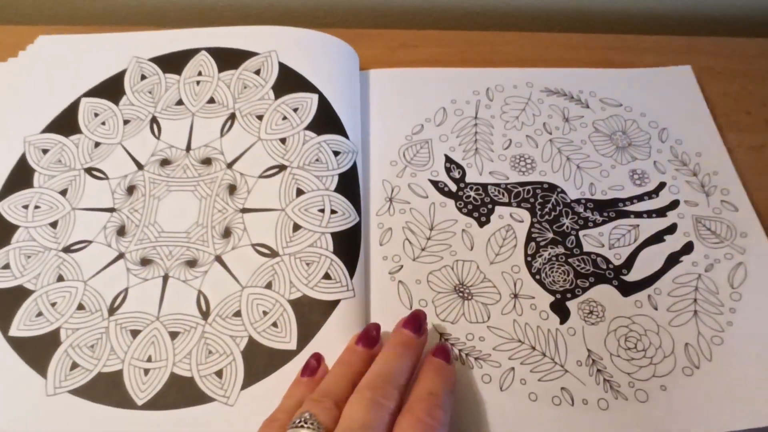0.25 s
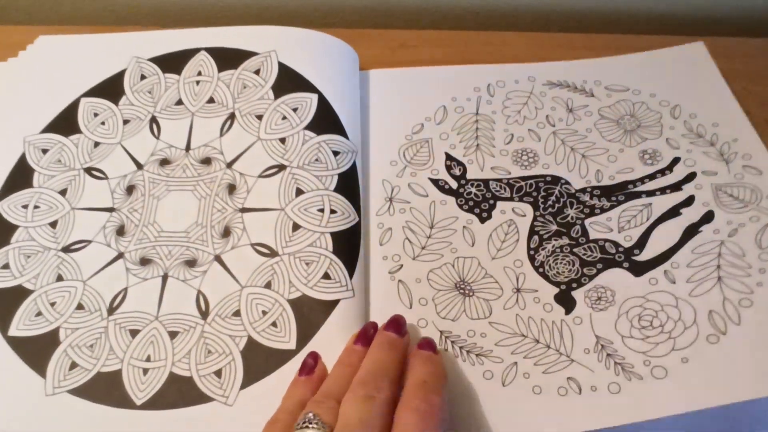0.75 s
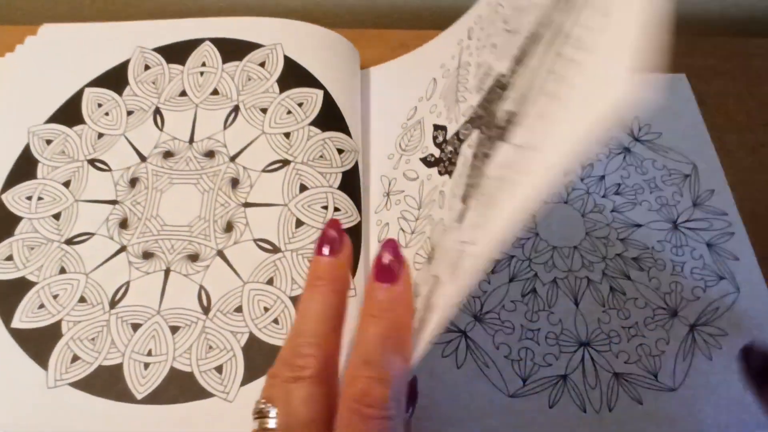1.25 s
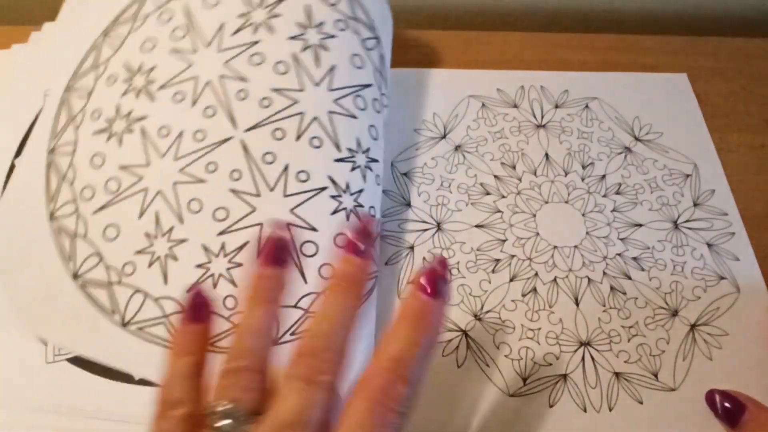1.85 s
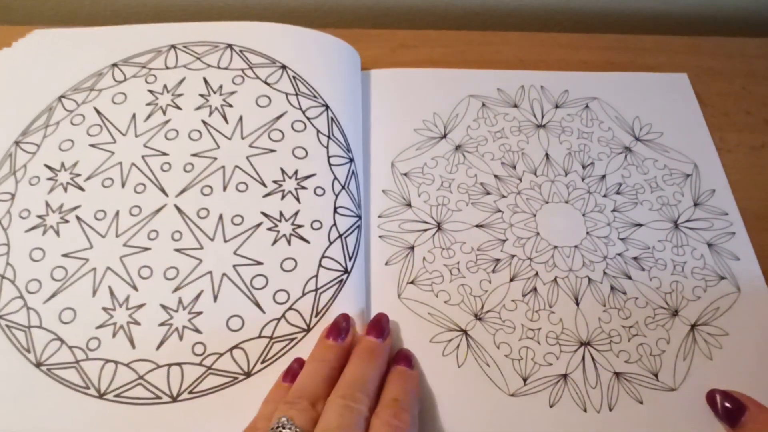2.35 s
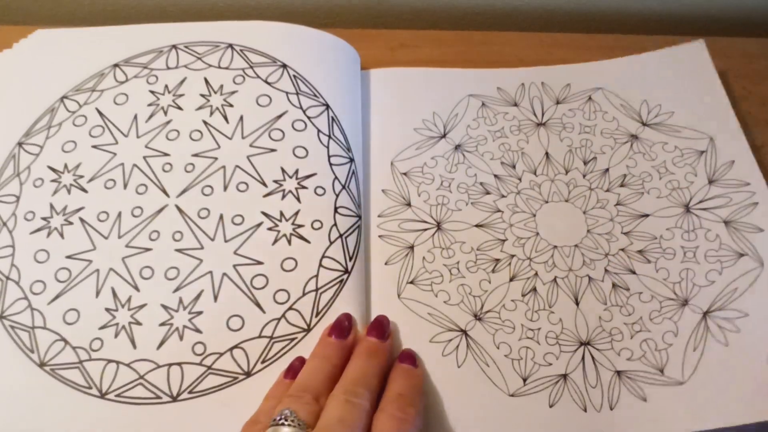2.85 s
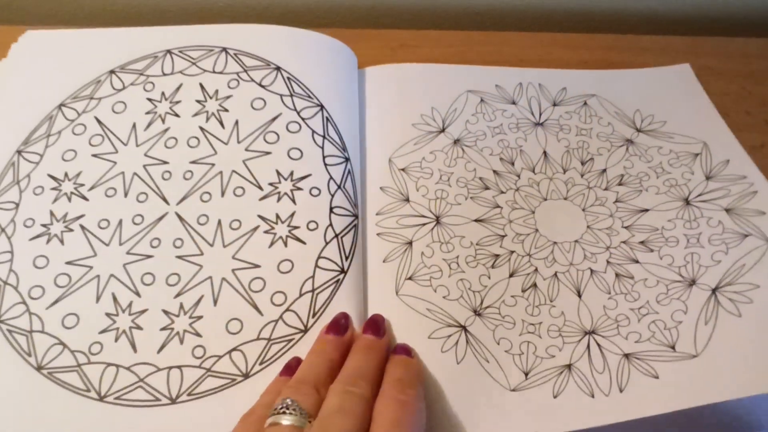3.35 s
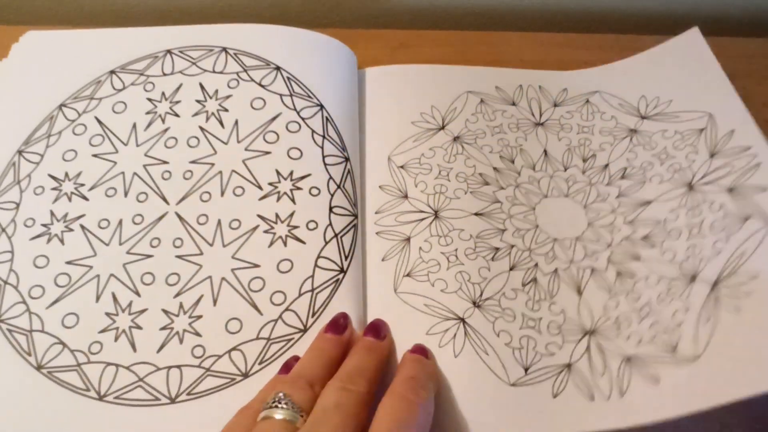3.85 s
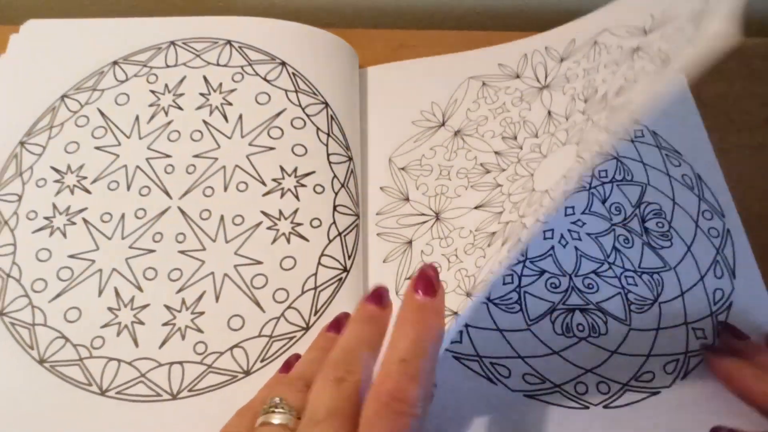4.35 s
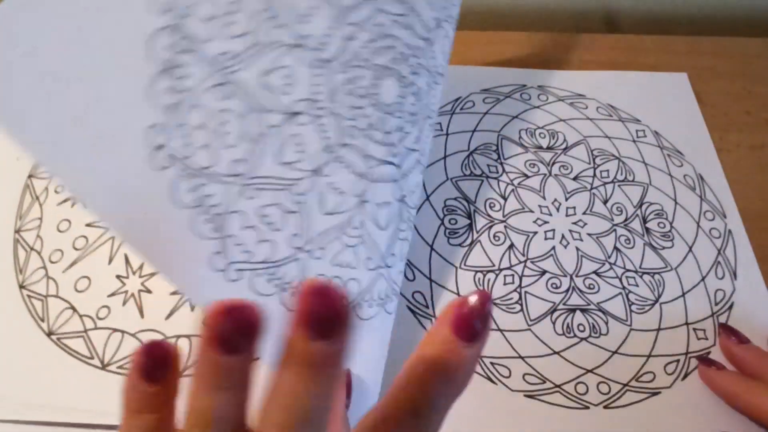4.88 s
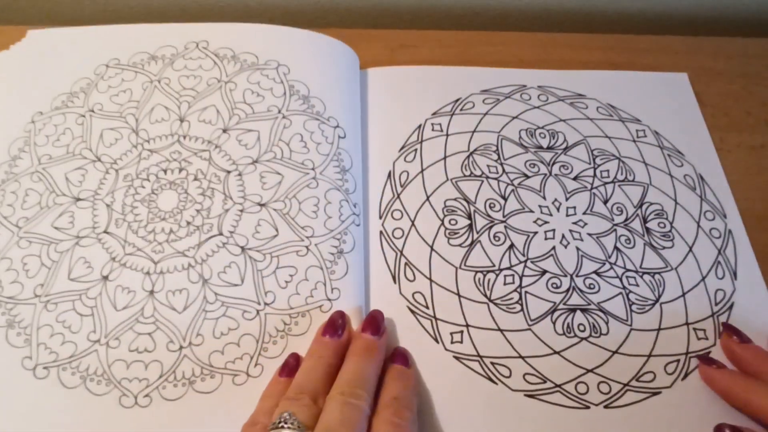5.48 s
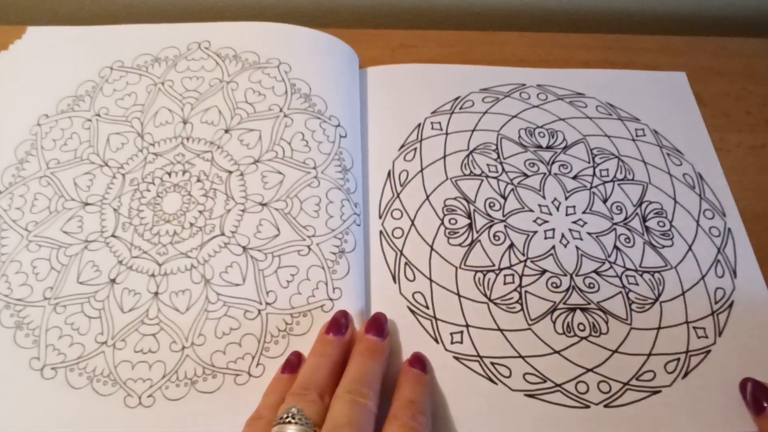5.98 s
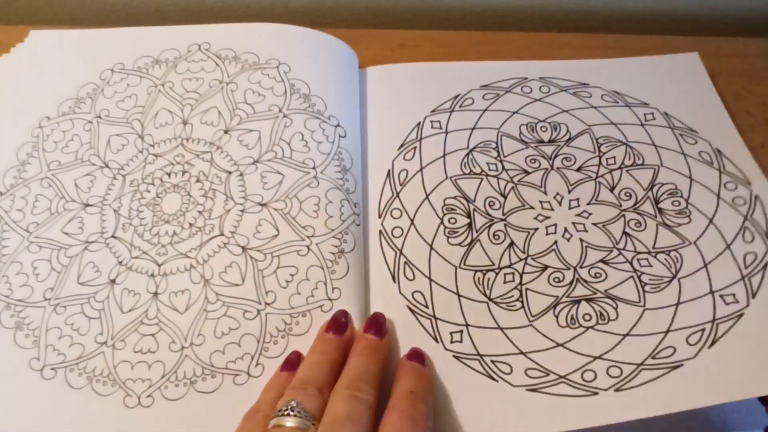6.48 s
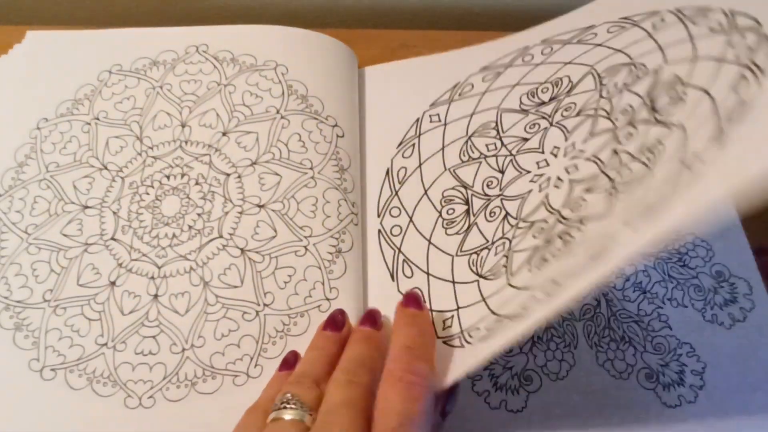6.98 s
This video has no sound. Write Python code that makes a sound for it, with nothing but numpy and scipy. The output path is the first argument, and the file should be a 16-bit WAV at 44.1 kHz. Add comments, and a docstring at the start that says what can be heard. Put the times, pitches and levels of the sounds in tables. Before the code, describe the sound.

Close above a desk in a small, quiet room, stiff paper pages are turned by hand. Soft thumps and small snaps come first, then a sliding swish and a hollow pop as the first page lies flat. After a faint lull, corner flicks and a sharp crackle start the second turn, which rustles over and pops flat. Light rubbing follows, then a crisp snap as a third page lifts.

```python
"""A faint brush of paper and a cluster of soft snaps and thumps open the turning of three stiff pages.
They belong to a colouring book, turned by hand on a desk in a small room, heard from close above.
Each page snaps at its picked corner (sharp steps), bends and flutters (bunched clicks), and slides
over its neighbour (grainy filtered noise); the first two pop flat after being laid down (damped modes).
Pitched scrapes, thumps of the book, echoes and a quiet background noise complete the scene."""
import sys
import numpy as np
from scipy import signal
from scipy.io import wavfile
from scipy.ndimage import uniform_filter1d

SR = 44100
rng = np.random.default_rng(int(sys.argv[2]) if len(sys.argv) > 2 else 0)


def transcribe(u):
    """Save the signal u as a 16-bit wav file named by the first command-line argument.

    u: samples, shape (n,) or (channels, n), limited to [-1, 1]; the rate is SR.
    q: integer samples, one column per channel.
    """
    v = np.clip(np.atleast_2d(u).T, -1, 1)
    q = np.round(v * 32767).astype(np.int16)
    wavfile.write(sys.argv[1], SR, q)


N = 318402  # length [samples]


def amp(db):
    """Decibels to gain."""
    return 10 ** (np.asarray(db) / 20)


def unit(x):
    """Scales to rms 1."""
    return x / np.sqrt(np.mean(x ** 2) + 1e-20)


def read(points, hz):
    """Reads a table on a log-frequency axis."""
    table_hz, value = np.transpose(points)
    return np.interp(np.log(hz + 1), np.log(table_hz + 1), value)


def add(mix, s, sound):
    """Mixes a sound in at time s [s]."""
    part = mix[max(round(s * SR), 0):][:len(sound)]
    part += sound[:len(part)]


def response(points, size=4096):
    """Causal minimum-phase impulse response with the given spectrum."""
    hz = abs(np.fft.fftfreq(size, 1 / SR))
    log_gain = np.log(amp(read(points, hz)))
    # the Hilbert transform of the log gain supplies the phase
    spectrum = np.exp(np.conj(signal.hilbert(log_gain)))
    return np.fft.ifft(spectrum).real[:size // 2]


def colour(x, points):
    """Filters by a spectrum, keeping the power of white noise."""
    taps = response(points)
    return signal.oaconvolve(x, taps / np.linalg.norm(taps))[:len(x)]


def lowpass(x, order, hz):
    """Butterworth low-pass along the last axis."""
    return signal.sosfilt(signal.butter(order, hz, fs=SR, output="sos"), x)


def highpass(x, order, hz):
    """Butterworth high-pass along the last axis."""
    return signal.sosfilt(signal.butter(order, hz, "highpass", fs=SR, output="sos"), x)


def grains(length, per_s, spread_db):
    """Random clicks of uneven size and either sign, rms 1."""
    size = amp(spread_db * np.minimum(rng.exponential(1, length), 4))
    sign = rng.choice([-1, 1], length)
    present = rng.random(length) < per_s / SR
    return unit(size * sign * present)


def patchy(x, depth_db=1.1, size=512):
    """The colour wanders a little as the contact patch moves over the sheet."""
    z = signal.stft(x, nperseg=size)[2]
    field = uniform_filter1d(rng.standard_normal(z.shape), size=4, axis=0)  # smooth over frequency
    field = unit(uniform_filter1d(field, size=5, axis=1))  # smooth over time
    return unit(signal.istft(z * amp(depth_db * field), nperseg=size)[1][:len(x)])


# spectrum of the background noise: (frequency [Hz], relative level [dB])
AMBIENCE = [(30, 2.5), (110, 4), (300, -1), (600, -8.5), (1200, -12), (2500, -20.5), (5000, -20),
            (7500, -19.5), (16000, -12)]


def background(level_db=-65):
    """Steady noise, strongest in the lows, under the paper."""
    return amp(level_db) * colour(rng.standard_normal(N), AMBIENCE)


# echoes from desk and walls: (delay [s], gain before dulling)
ECHOES = [(.0029, 0.1), (.0062, 0.071), (.0091, 0.49), (0.0113, .2), (0.0142, 0.39), (0.021, 0.25)]
# time for the room's tail to fall by 60 dB: (frequency [Hz], time [s])
ROOM_T60 = [(150, 0.28), (400, 0.58), (800, 0.3871), (1500, 0.3), (3500, 0.43), (7300, 0.45)]
# colour of the room's tail: (frequency [Hz], relative level [dB])
ROOM_COLOUR = [(150, -3), (800, -5.5), (2500, -4.5), (7000, -12.5), (14000, -13)]


def room(x, tail_db=-1, build_s=0.018, echo_edge_hz=4500, size=256):
    """A few dull early echoes, and a tail that builds up, then dies band by band."""
    hz, t, z = signal.stft(rng.choice([-1., 1.], SR // 2), SR, nperseg=size)
    z = z * amp(-60 * t / read(ROOM_T60, hz)[:, None])
    tail = signal.istft(z * amp(read(ROOM_COLOUR, hz))[:, None], SR, nperseg=size)[1]
    plain = signal.istft(z, SR, nperseg=size)[1]
    onset = 1 - np.exp(-(np.arange(len(tail)) / SR / build_s) ** 2)
    # scaled by the uncoloured tail, so the room's colour also sets its level
    tail *= amp(tail_db) * onset / np.linalg.norm(plain * onset)
    early = np.zeros(len(tail))
    for delay, gain in ECHOES:
        early[round(delay * SR)] += gain
    return signal.fftconvolve(x, tail + lowpass(early, 1, echo_edge_hz))[:N]


# fingers and pages bumping the block of the book: (time [s], level [dB], pitch [Hz])
THUMPS = [(0.1266, -36, 406), (.148, -33, 390), (0.1817, -30.5, 390), (0.2645, -29.5, 308),
          (0.3099, -37.5, 282), (1.758, -39, 109.5), (2.396, -45, 120), (2.715, -53, 218),
          (3.82, -36.5, 88.6), (4.552, -42.5, 170), (4.619, -36, 147.5), (4.655, -40.5, 200),
          (4.917, -41, 200), (5.506, -42.5, 144.7), (5.711, -44.5, 280)]


def thumps(cycles=0.46, size=4096):
    """A soft push on the stack of pages: a low sine gone within a cycle or two."""
    out, t = np.zeros(N), np.arange(size) / SR
    for s, db, hz in THUMPS:
        add(out, s, amp(db) * np.exp(-t * hz / cycles) * np.sin(2 * np.pi * hz * t))
    return out


# fingertip or paper dragging with a hoarse, pitched scrape:
# (time [s], length [s], level before the swell [dB], centre [Hz], width [Hz])
SCRAPES = [(0.379, .12, -64, 4450, 1530), (.49, .13, -61, 4730, 1930), (0.783, 0.084, -66, 3050, 600),
           (0.938, 0.061, -61, 3246, 1500), (2.171, .1, -55.5, 715.5, 214), (2.807, 0.24, -64, 5450, 443),
           (3.017, 0.14, -70, 2970, 390), (4.599, 0.06, -55, 5920, 900), (5.205, 0.13, -56.5, 4980, 1025),
           (6.474, 0.08, -52.5, 2358, 597), (6.921, 0.054, -53.5, 3180, 300)]


def scrapes(size=2048):
    """The contact sticks and slips at a loose rate: a fuzzy band of noise that swells and fades."""
    out = np.zeros(N)
    for s, length, db, hz, width in SCRAPES:
        t = np.arange(round(length * SR)) / SR
        # two slow noises on a carrier; the filter's start-up is cut off
        slip = lowpass(rng.standard_normal((2, len(t) + size)), 2, width / 2)[:, size:]
        phase = 2 * np.pi * hz * t
        band = unit(slip[0] * np.cos(phase) + slip[1] * np.sin(phase))
        add(out, s, amp(db) * band * np.sin(np.pi * t / length))
    return out


# strokes of paper or fingers over paper, page after page:
# (start [s], speeding up [s], slowing down [s], friction level before the slide's mix gains [dB],
#  sheet body re friction [dB], edge hiss re friction [dB])
STROKES = [(0, 0.0067, 0.066, -59.5, 1.5, -2), (.3, 0.14, .2, -66, -7.5, -3.5),
           (.705, 0.014, 0.058, -65.5, -3, 7), (0.794, 0.017, 0.089, -65, 0.5, 8),
           (.93, 0.023, 0.1, -63.5, 3.5, 0.5), (1.085, 0.028, 0.17, -55.5, -1.5, 0),
           (1.356, .02, 0.27, -63, 1, 2), (1.52, .12, 0.08, -56.5, -1, 3),
           (1.648, 0.06, 0.042, -50, -2.5, 2), (1.72, 0.1, 0.21, -58, 3, 2), (1.89, 0.043, .11, -56, -2, 6),
           (2.099, 0.08, 0.12, -55, -4.5, 3.5), (2.24, 0.087, 0.13, -69, 1.5, 4.5),
           (2.73, 0.038, .04, -77, 4, 7), (2.825, 0.017, 0.079, -66, 1, -0.5),
           (2.89, 0.069, 0.051, -61, -2, 4), (3.04, 0.059, 0.095, -68, -3, 4.5),
           (3.15, 0.11, .07, -58, -7.5, 3.5), (3.369, 0.048, .09, -66, 12, 3),
           (3.53, 0.04, 0.24, -56.5, -8, 3.5), (3.84, 0.11, 0.052, -61.5, 6.5, 8.5),
           (4.02, .04, 0.13, -71, 17, 8), (4.119, 0.084, 0.06, -54.5, 12, 7),
           (4.27, 0.15, 0.28, -59.5, 2, -1), (4.39, 0.12, 0.03, -52.5, -1.5, 6.5),
           (4.569, 0.13, 0.2, -56, -1.5, 2), (4.82, 0.13, 0.095, -57.5, 1, 3.5),
           (5, 0.032, 0.16, -54.5, -0.5, -1), (5.215, 0.04, 0.093, -55, -4, 2.5),
           (5.25, 0.037, 0.14, -62, -2, 7), (5.38, 0.18, 0.12, -69, -0.5, 2),
           (5.649, .03, 0.12, -72.5, -4.5, 2.5), (6.39, 0.01, 0.046, -70.5, 5, 0.5),
           (6.463, 0.012, 0.14, -59.5, 2.5, 3), (6.63, 0.12, 0.064, -55.5, -7, 1),
           (6.905, 0.033, 0.062, -53.5, 1.5, 3.5), (7.07, 0.11, .1, -56.5, -2, 2.5)]
STROKE_CURVE = 1.095  # friction grows as this power of the speed
RESTING_DB = -90  # the hand never lies quite still on the page


def stroke_levels(uneven_db=1.5, uneven_s=.018):
    """Strokes speed up, slow to rest and add in power: dB of friction, and of body and hiss against it."""
    power = np.full((3, N), amp(RESTING_DB) ** 2)
    for s, rise, fall, db, body_db, hiss_db in STROKES:
        t = np.arange(0, rise + fall, 1 / SR)
        progress = np.interp(t, [0, rise, rise + fall], [0, .5, 1])
        speed = abs(np.sin(np.pi * progress))
        for layer, colour_db in zip(power, (0, body_db, hiss_db)):
            add(layer, s, (amp(db + colour_db) * speed ** STROKE_CURVE) ** 2)
    level, body, hiss = 10 * np.log10(power)
    # the hand's pressure is never quite even
    pressure = unit(uniform_filter1d(rng.standard_normal(N), size=max(round(uneven_s * SR), 1)))
    return level + uneven_db * pressure, body - level, hiss - level


# spectra of rubbing fibres, sheet body and sheet edge: (frequency [Hz], relative level [dB])
FRICTION = [(100, -42), (900, -13.5), (2000, -2), (3000, 1.5), (4400, 3), (5600, 5.5), (7000, -18.5),
            (16000, -25)]
BODY = [(60, -4.5), (150, -3), (350, -5), (530, -3.5), (780, 2), (1200, 0), (1900, -3.5), (2800, -18),
        (6000, -53.5)]
HISS = [(100, -61), (3500, -28), (5300, -7.5), (6400, 1), (7500, 6), (8500, -1), (12000, -3.5),
        (16000, -4.5)]


def slide(friction_db=0, body_db=0, hiss_db=2, catch=.75,
          fizz_db=-8, fizz_growth=0.41, usual_db=-58, fizz_hz=11000):
    """Fibres slip and catch: a smooth hiss with fine grains, radiated by the sheet and its edge."""
    level, body, hiss = stroke_levels()
    catches = catch * grains(N, per_s=700, spread_db=3.5)
    out = np.zeros(N)
    for spectrum, db in (FRICTION, friction_db), (BODY, body + body_db), (HISS, hiss + hiss_db):
        rubbing = patchy(rng.standard_normal(N) + catches)
        out += amp(level + db) * colour(rubbing, spectrum)
    # a fast edge fizzes in the top octave, more than in proportion
    fizz = highpass(rng.standard_normal(N), 4, fizz_hz)
    edge_db = level + hiss
    return out + amp(edge_db + fizz_growth * (edge_db - usual_db) + fizz_db) * fizz


# runs of tiny buckles as the sheet bends:
# (time [s], rise [s], fall time constant [s], level [dB], upper edge [Hz])
FLUTTERS = [(1.155, 0.018, 0.034, -55, 1800), (1.199, 0.021, 0.021, -50, 740),
            (1.752, 0.0058, 0.017, -38.5, 890), (2.179, 0.011, 0.05, -71, 780),
            (3.633, 0.0076, 0.018, -51, 1470), (3.76, 0.0046, 0.072, -50.5, 1160),
            (3.809, 0.0058, 0.004, -28.5, 1800), (3.817, 0.0009, 0.014, -20.5, 2400),
            (3.82, 0.0023, 0.0094, -17.5, 5900), (4.081, 0.015, 0.031, -33.5, 2100),
            (4.14, 0.0039, 0.014, -27, 2200), (4.261, 0.0041, 0.014, -36.5, 1320),
            (4.617, 0.0038, 0.011, -47, 700), (4.886, 0.01, 0.058, -39.5, 787),
            (4.91, .012, 0.024, -38, 1880), (4.943, 0.0025, .012, -42.5, 1290),
            (5.462, 0.045, 0.022, -50.5, 648), (6.988, 0.011, 0.012, -37.5, 1258),
            (7.062, 0.011, 0.019, -43, 1370)]
# spectrum of the bending sheet: (frequency [Hz], relative level [dB])
BENDING = [(60, 0.5), (130, -7), (300, -8.5), (520, -4.5), (750, 0.5), (1200, 0.5), (2050, -0.5),
           (2400, -4), (3300, -8), (4200, -2), (5000, -9), (7500, -9), (16000, -14)]


def flutters(rush=0.54, flaps_per_s=110, throb_db=3, settle_s=0.018, low_share=0.21, size=16384):
    """Many small buckles in quick succession; the sharper the bend, the higher they sound."""
    out, t = np.zeros(N), np.arange(size) / SR
    for s, rise, fall, db, edge_hz in FLUTTERS:
        buckles = grains(size, per_s=2300, spread_db=2.5) + rush * rng.standard_normal(size)
        # after the first rush the sheet starts to flap, and the buckles come in uneven bunches
        wander = unit(uniform_filter1d(rng.standard_normal(size), size=300))
        turns = np.cumsum(flaps_per_s * (1 + .5 * wander)) / SR
        buckles *= amp(throb_db * np.minimum(t / settle_s, 1) * np.cos(2 * np.pi * turns))
        softened = lowpass(colour(buckles, BENDING), 3, edge_hz)
        softened = highpass(softened, 1, low_share * edge_hz)
        swell = np.minimum(t / rise, 1) * np.exp(-np.maximum(t - rise, 0) / fall)
        # the level holds at the height of the swell
        add(out, s, amp(db) * unit(softened * swell) * np.sqrt(np.mean(swell ** 2)))
    return out


# page edges snapping off a fingertip:
# (time [s], level before snap_db [dB], sheet body re friction [dB], edge hiss before hiss_db [dB])
SNAPS = [(.022, -53, -10, 0), (0.1269, -46.5, 4, -2.5), (0.149, -44, 4, 1), (0.1817, -41.5, 3, 1),
         (0.266, -38, -2, -2.5), (0.3102, -39.5, 0.5, -2), (1.366, -51, -12, 0.5), (1.918, -46.5, 5.5, 7),
         (1.949, -42, 1.5, 6), (2.095, -53, 1, 2), (3.3097, -41, 2.5, 2.5), (3.3652, -33.5, 4.5, 0.5),
         (3.4011, -32.5, 6.5, 0), (3.424, -35, 7, 1.5), (3.806, -27, -4, -4.5), (4.137, -42, 9, 9),
         (4.1437, -25, 4.5, 3), (4.181, -29.5, -9, -10), (4.207, -31, -22, -1.5), (4.227, -42, 5.5, 0),
         (4.2668, -43, 2, -22), (4.851, -43.5, -9, -0.5), (5.1645, -55, 5, 9.5), (5.2211, -54.5, 10.5, -3),
         (6.135, -67, -4, 6), (6.3945, -60, 0, 1), (6.467, -52, 3, 5), (6.473, -47.5, 6, 2),
         (6.487, -31, .5, -6), (6.6359, -52.5, 4, 7.5), (6.8084, -40, 6.5, 3.5), (7.0953, -48, 0, 0.5),
         (7.21, -44.5, -1, 6)]


def snaps(snap_db=17, scuff=0.11, scuff_s=0.0058, body_db=0, hiss_db=1, size=2048):
    """An edge lets go: one sharp step and a brief scuff, coloured by fibres, sheet and edge."""
    out, t = np.zeros(N), np.arange(size) / SR
    for s, db, body, hiss in SNAPS:
        kick = scuff * rng.standard_normal(size) * np.exp(-t / scuff_s) - (t == 0)
        kick /= np.linalg.norm(kick)
        sound = colour(kick, FRICTION)
        sound += amp(body + body_db) * colour(kick, BODY)
        sound += amp(hiss + hiss_db) * colour(kick, HISS)
        add(out, s, amp(db + snap_db) * sound)
    return out


# the bowed sheet popping through: (time [s], level [dB], pitch [Hz], gain of the upper modes [dB])
POPS = [(.2835, -36, 900, -5), (1.209, -43, 575, -15), (1.232, -39.5, 583, -14), (1.729, -37, 760, -20),
        (1.7585, -35, 790, -10), (1.768, -37, 666, -5), (1.9498, -37, 1197, -2.5), (2.229, -39, 677, -10),
        (2.3958, -14, 822, -2), (4.1068, -24, 851, -8), (4.197, -30, 920, 4), (4.2642, -28, 896, 0),
        (4.8895, -43, 920, -1), (4.9235, -25, 850, -6), (5.4585, -43.5, 712.7, -18),
        (5.506, -16.5, 802, -6.5), (5.672, -47.5, 670, -12), (5.708, -47.5, 650, -13.5),
        (7.0042, -25.5, 853, -23.5), (7.0635, -34.5, 760, -18), (7.0808, -30, 770, -17)]
# modes of the sheet: (multiple of the pitch, level re the pop [dB], time to peak and decay constant [s])
SHEET = [(.36, -21, .0016), (.93, -20, 0.0046), (1, -2, 0.0011), (1.55, -7, 0.0014), (1.9, -9, 0.0012),
         (2.5, -20, 0.0015), (3.398, -23, .0006)]


def pops(size=4096):
    """The bowed sheet flips through and swings for a few heavily damped cycles."""
    out, t = np.zeros(N), np.arange(size) / SR
    for s, db, hz, upper_db in POPS:
        for multiple, mode_db, decay in SHEET:
            envelope = t / decay * np.exp(1 - t / decay)
            swing = envelope * np.sin(2 * np.pi * hz * multiple * t)
            is_upper = multiple > np.sqrt(2)  # half an octave above the pitch
            add(out, s, amp(db + mode_db + upper_db * is_upper) * swing)
    return out


def scene(slide_db=-2):
    """All the paper sounds in the room, over its quiet background."""
    paper = thumps() + scrapes() + amp(slide_db) * slide() + flutters() + snaps() + pops()
    return (background() + room(paper) + paper)[None]


# microphone response, with a deep dip in the top octave: (frequency [Hz], gain [dB])
MICROPHONE = [(20, -27.5), (48, -17.5), (95, -1), (4700, 1.5), (5000, -8), (5900, -5), (6300, 2), (7600, 0),
              (7950, -1), (8550, -2.5), (8800, -18.5), (11400, -28.5), (11750, -9), (16000, -7.5)]
EDGE_HZ = 15950  # upper band limit


def record(dry):
    """Microphone colour, then a steep band limit."""
    heard = signal.oaconvolve(dry, response(MICROPHONE)[None])[:, :N]
    band_limit = signal.firwin(511, EDGE_HZ, window=("kaiser", 9), fs=SR)
    return signal.oaconvolve(heard, band_limit[None], "same")


dry = scene()
out = record(dry)
transcribe(out)
```